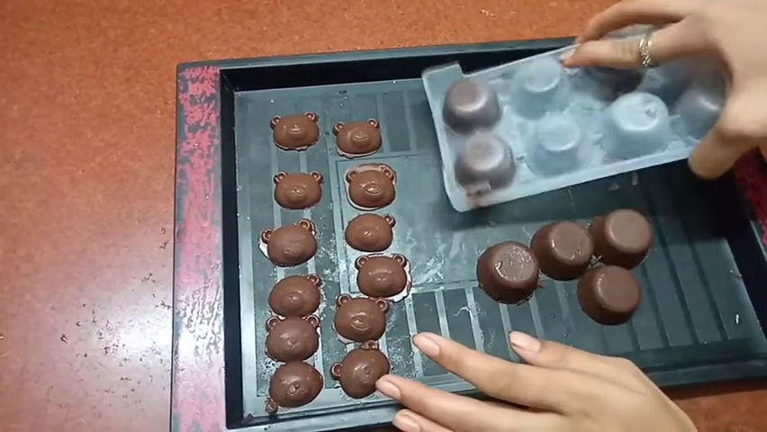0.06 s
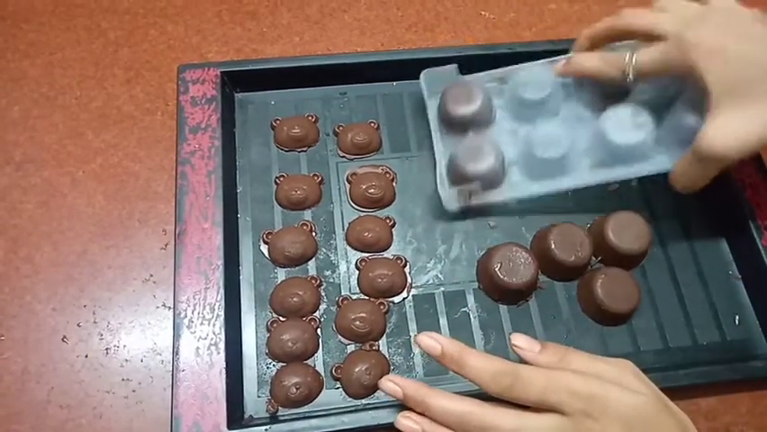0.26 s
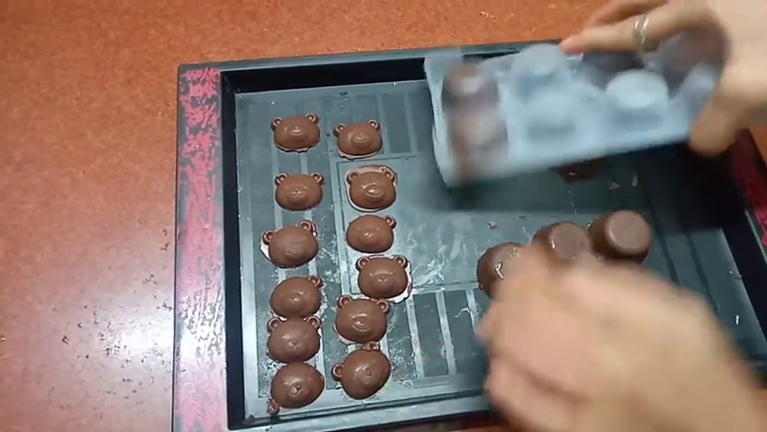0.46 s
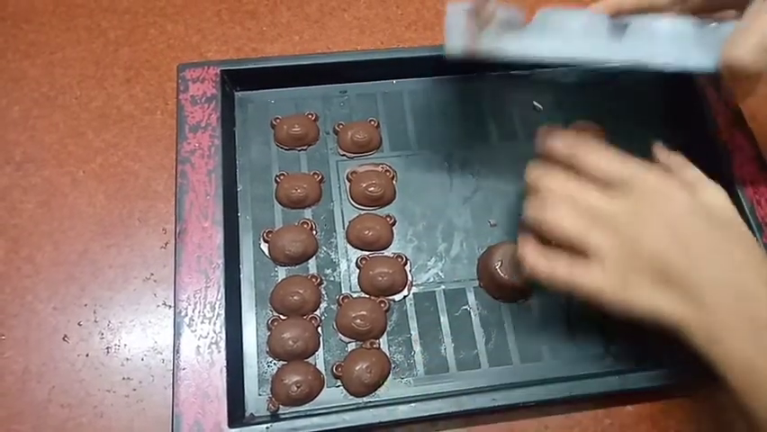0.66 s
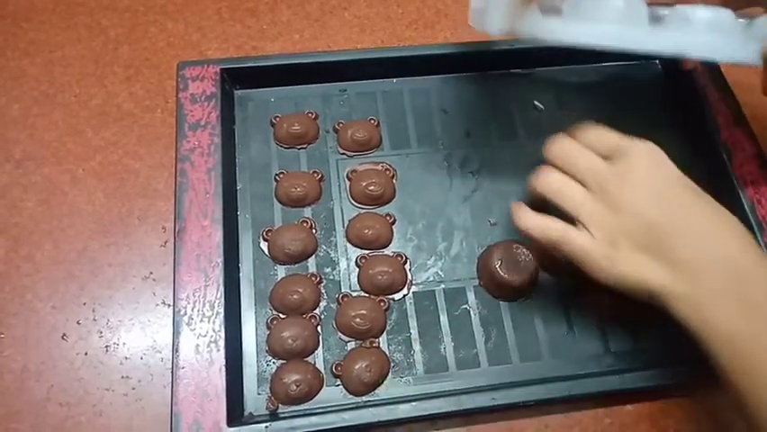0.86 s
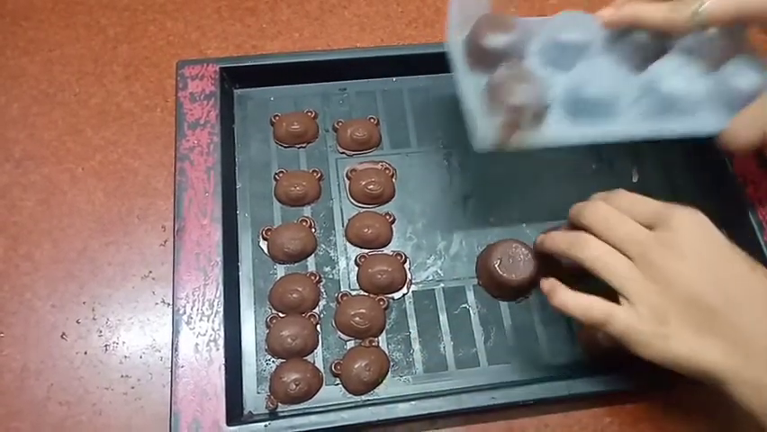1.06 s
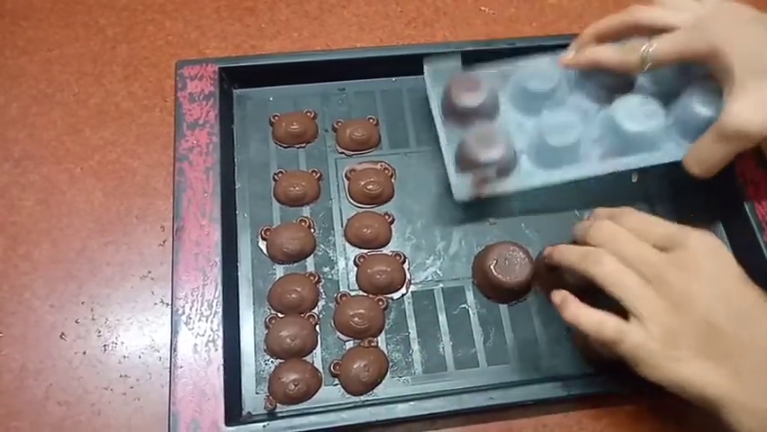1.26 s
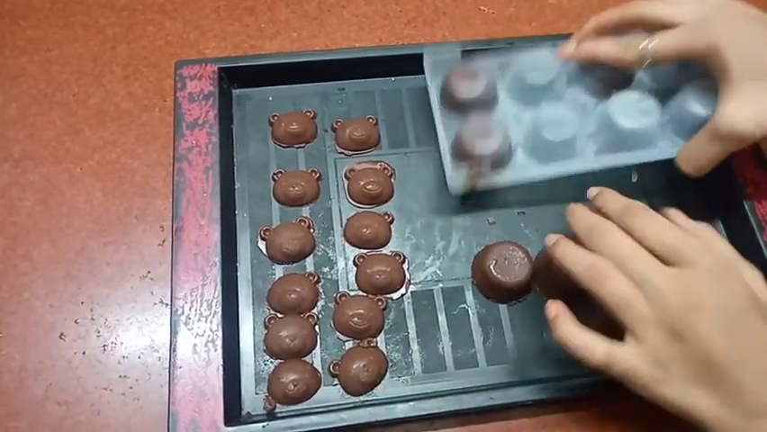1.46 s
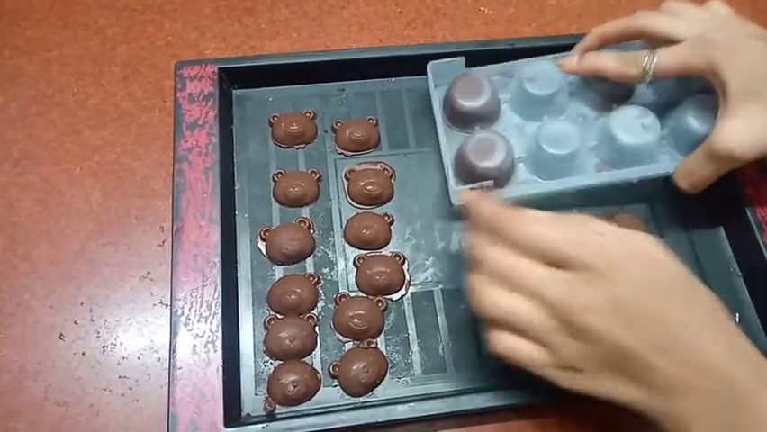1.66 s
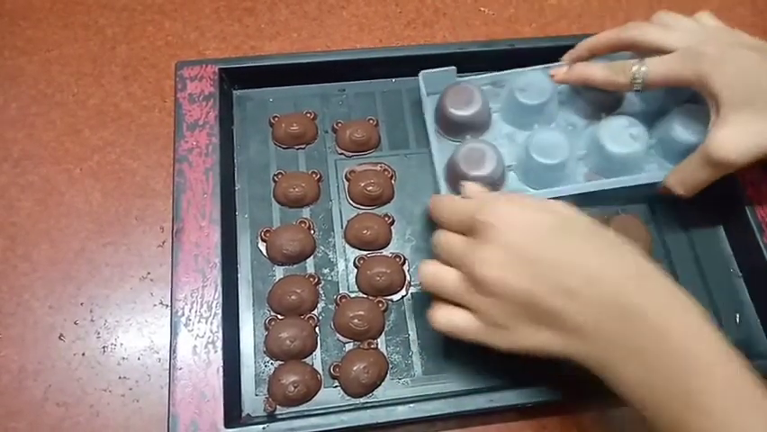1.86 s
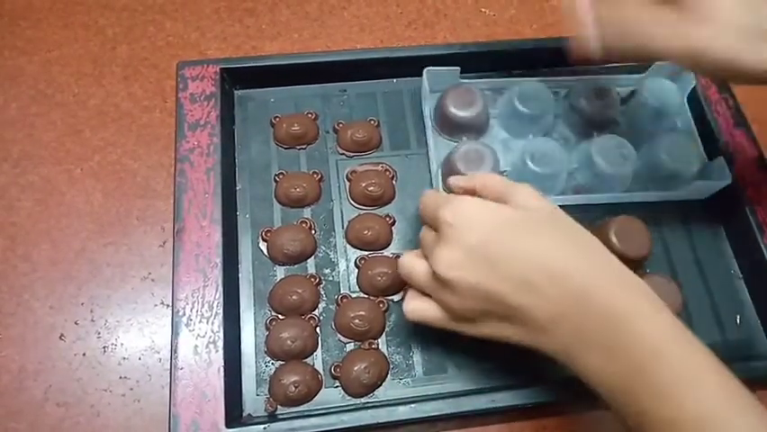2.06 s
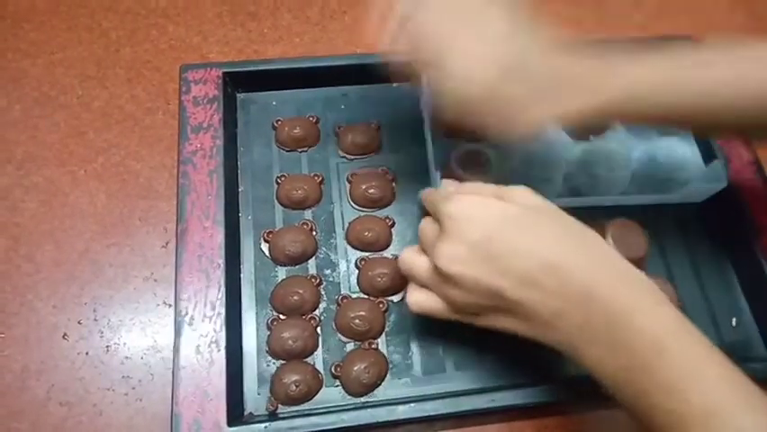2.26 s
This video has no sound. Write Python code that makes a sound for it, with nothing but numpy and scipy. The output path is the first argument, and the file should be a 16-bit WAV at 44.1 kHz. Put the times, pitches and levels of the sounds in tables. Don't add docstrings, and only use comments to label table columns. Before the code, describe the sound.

A plastic mould is slammed on a plastic tray, one hard crack, a pause with small scuffs, then three quick slams, a snap and duller bouncing knocks, close microphone in a live, echoing kitchen.

```python
import sys
import numpy as np
from scipy import signal
from scipy.fft import rfft, irfft
from scipy.io import wavfile
from scipy.ndimage import uniform_filter1d, minimum_filter1d

SR = 44100
rng = np.random.default_rng(int(sys.argv[2]) if len(sys.argv) > 2 else 0)


def inscribe(sig):
    pcm = np.round(np.clip(np.atleast_2d(sig).T, -1, 1) * 32767)
    wavfile.write(sys.argv[1], SR, pcm.astype(np.int16))


def level_to_linear(level):
    exponent = np.asarray(level, float) / 20
    return 10 ** exponent


N = 101429
LEAD = 13230
M = N + LEAD


def table_at(table, hz):
    table_hz, value = np.array(table).T
    return np.interp(np.log(np.maximum(hz, 1)), np.log(table_hz), value)


def unit(x):
    return x / np.sqrt(np.mean(x ** 2))


def decay(t, t60):
    return np.exp(-np.log(1000) * t / t60)


def band(x, hz, width):
    return signal.lfilter(*signal.iirpeak(hz, hz / width, SR), x)


def colour(x, db_of):
    cepstrum = irfft(np.log(level_to_linear(db_of(np.fft.rfftfreq(2048, 1 / SR)))))
    cepstrum[1:1024] *= 2
    cepstrum[1025:] = 0
    impulse = irfft(np.exp(rfft(cepstrum)))
    return signal.fftconvolve(x, impulse)[:len(x)]


# pitch_hz, density_db (per Hz)
AIR = [(25, -39), (60, -31.5), (100, -35), (180, -8.5), (450, -3), (1000, -17), (3800, -14.5),
       (5200, -44.5)]
# pitch_hz, width_hz, level_db
DRONE = [(99.7, 4.4, -60.5), (156.8, 24, -53.5), (203.7, 30, -60.5)]


def air():
    spectrum = AIR + [(9000, -77.5), (16000, -67)]
    hiss = colour(rng.standard_normal(M), lambda hz: table_at(spectrum, hz))
    out = level_to_linear(-50) * unit(hiss)
    for hz, width_hz, db in DRONE:
        out = out + level_to_linear(db) * unit(band(rng.standard_normal(M), hz, width_hz))
    return out


# pitch_hz, level_db
MIC = [(60, -1), (900, 3.5), (4250, 0.5), (5250, -15), (9200, -22), (9800, -32.5), (12300, -32),
       (13000, -28)]


def around(centre_hz, db_oct2):
    def db_of(hz):
        octaves = np.log2(np.maximum(hz, 20) / centre_hz)
        floor_db = -21 + 2 * (hz > centre_hz)
        return np.maximum(db_oct2 * octaves ** 2, floor_db) + table_at(MIC, hz)
    return db_of


# pitch_hz, level_db, t60_s
TRAY = [(71, -1, 0.039), (118.8, -2, 0.3), (269, 20.5, 0.022), (377, 5, 0.046), (444, 0.5, 0.023),
        (673, -10.5, 0.04), (735.3, 3.5, 0.036), (787, 6, 0.067), (844, -14.5, 0.18), (951, 9.5, 0.069),
        (1161.5, -8.5, 0.15)]
# pitch_hz, level_db, t60_s
MOULD = [(1228, 7.5, 0.048), (1427, -0.5, 0.12), (1532, 6, 0.023), (1690, -5.5, 0.09), (1750, -6, 0.15),
         (2059, 6, 0.15), (2065, -6.5, 0.019), (2437, 8.5, 0.12), (2705, 9.5, 0.056), (2880, -22, 0.09),
         (3335, -22, 0.09), (3708, 16, 0.041), (3620, 10.5, 0.016), (4380, -18.5, 0.055)]


def body(damp=1.):
    scatter_db, detune = 2, .004
    t = np.arange(8000) / SR
    hz, db, t60 = np.array(TRAY + MOULD).T[:, :, None]
    level_luck, pitch_luck = rng.standard_normal((2,) + hz.shape)
    tone = np.sin(2 * np.pi * hz * (1 + detune * pitch_luck) * t)
    ring = level_to_linear(db + scatter_db * level_luck) * tone * decay(t, t60 * damp)
    return ring.sum(axis=0)


def strikes(rows, db_oct2, damp=1., skid=False):
    chatter, crack_db, ring_wet_db = 0.021, 5, -13.5
    out = np.zeros((2, M + 20000))
    t = np.arange(8000) / SR
    late = .022 * skid
    for s, db, hz, length in rows:
        shape = np.exp(-((t - late) / length) ** 2) if skid else np.exp(-t / length)
        rattle, hiss = rng.standard_normal((2, len(t)))
        click = 1. * (np.arange(len(t)) == int(late * SR))
        force = chatter * rattle ** 3 * shape
        if not skid:
            force = force + click
        ring = unit(signal.fftconvolve(force, body(damp))[:len(t)])
        crack = level_to_linear(crack_db) * unit(hiss * shape)
        to_room = level_to_linear(ring_wet_db) * ring + unit(click)
        near = unit(colour(ring + crack, around(hz, db_oct2)))
        far = unit(colour(to_room, around(hz, db_oct2)))
        gain = level_to_linear(db) * np.sqrt(length * SR / len(t)) / 2
        i = int((s - late) * SR) + LEAD
        out[:, i:i + len(t)] += gain * np.array([near, far])
    return out[:, :M]


# start_s, level_db, pitch_hz (colour centre), chatter_s
BLOWS = [
    (-.19, 6.5, 2120, 0.0064),
    (.2022, 5, 2270, 0.0021),
    (.2052, 4.5, 1730, 0.0092),
    (1.1572, -2.5, 2100, .003),
    (1.1595, -1.5, 1960, 0.015),
    (1.3515, -1.5, 2350, 0.0032),
    (1.356, -8.5, 935, 0.009),
    (1.385, -9, 1640, 0.0032),
    (1.5385, 2.5, 2180, 0.001),
    (1.5415, 4, 1640, 0.0051),
]


def blows():
    return strikes(BLOWS, -2.2)


# pitch_hz, t60_s
ROOM = [(150, 0.67), (600, 0.54), (1500, 0.91), (3000, 0.68), (6000, 0.6), (12000, 0.5)]


def kitchen(x):
    room_db, rise_s = -3.5, 0.0027
    t = np.arange(SR) / SR
    tail = 0
    for hz in 60 * 2 ** np.arange(0, 8.5, .5):
        tail = tail + band(rng.standard_normal(SR), hz, hz / 3) * decay(t, table_at(ROOM, hz))
    tail = tail * (1 - np.exp(-t / rise_s))
    tail = tail / np.sqrt(np.sum(tail ** 2))
    return level_to_linear(room_db) * signal.fftconvolve(x, tail)[:M]


# start_s, level_db, pitch_hz, t60_s
THUDS = [
    (.2035, -20.5, 108.5, 0.082),
    (1.158, -28, 173, 0.091),
    (1.352, -23, 254, 0.048),
    (1.54, -29, 226, 0.1),
]


def thuds():
    t = (np.arange(M) - LEAD) / SR
    out = np.zeros(M)
    for s, db, hz, t60 in THUDS:
        since = np.maximum(t - s, 0)
        out += level_to_linear(db) * np.sin(2 * np.pi * hz * since) * decay(since, t60)
    return out


# start_s, level_db, pitch_hz (colour centre), chatter_s
TICKS = [
    (.694, -25.5, 1290, 0.0011),
    (.722, -51, 1270, 0.0025),
    (1.077, -32.5, 3040, .001),
    (1.363, -17, 2930, .0015),
    (1.6686, -2.5, 2400, 0.0011),
    (1.68, -21.5, 2380, .002),
    (2.225, -35, 2500, 0.0025),
    (2.268, -38, 3800, 0.0024),
]


def ticks():
    return strikes(TICKS, -4.2, damp=0.2)


# start_s, level_db
SLIDE = [
    (0.719, -43.5),
    (0.798, -47),
    (0.868, -40),
    (0.919, -39.5),
    (0.969, -40),
    (1.009, -47),
    (1.058, -63),
    (1.12, -48),
    (1.15, -50),
]


def slide():
    grains_per_s, grain_db = 1400, 0.5
    chance, size = rng.random((2, M))
    grain_level = level_to_linear(-grain_db * np.log(size + 1e-9))
    grains = (chance < grains_per_s / SR) * grain_level * rng.standard_normal(M)
    ring = unit(signal.fftconvolve(grains, body(.25))[:M])
    sound = colour(ring + 2.1 * unit(grains), around(1400, -2.8))
    s, db = np.array(SLIDE).T
    t = (np.arange(M) - LEAD) / SR
    return unit(sound) * level_to_linear(np.interp(t, s, db, -120, -120))


# start_s (middle of the skid), level_db, pitch_hz (colour centre), half_length_s
SCUFFS = [
    (.749, -22, 960, 0.011),
    (.771, -16, 1400, 0.0051),
    (.79, -34, 2400, 0.024),
]


def scuffs():
    return strikes(SCUFFS, -10.5, damp=0.63, skid=True)


# start_s, level_db, pitch_hz (colour centre), chatter_s
KNOCKS = [
    (.8845, -25.5, 570, 0.011),
    (.885, -42.5, 2360, 0.0015),
    (1.879, -26, 840, 0.018),
    (1.886, -27, 860, 0.015),
    (1.9285, -9.5, 850, 0.0047),
    (1.942, -12.5, 1204, 0.0087),
    (1.955, -12.5, 950, 0.0052),
    (2.0108, -15, 1064, 0.0061),
    (2.011, -22.5, 4100, 0.0014),
    (2.235, -29, 700, .005),
]


def knocks():
    return strikes(KNOCKS, -4.5, damp=0.63)


def scene():
    blow_wet_db, small_wet_db = -4.5, -6
    blow_near, blow_far = blows()
    small_near, small_far = ticks() + slide() + scuffs() + knocks()
    echoes = kitchen(level_to_linear(blow_wet_db) * blow_far + level_to_linear(small_wet_db) * small_far)
    mono = air() + blow_near + small_near + echoes + thuds()
    return np.array([mono[LEAD:], mono[LEAD:]])


def band_limit(x):
    return signal.sosfilt(signal.butter(12, 15600, fs=SR, output="sos"), x)


def record(dry):
    top_db, ahead_s, duck_s, release_db_s = -.7, .023, .006, 102
    x = signal.sosfilt(signal.butter(3, 75, "high", fs=SR, output="sos"), dry[0])
    gain_db = np.minimum(top_db - 20 * np.log10(np.abs(x) + 1e-9), 0)
    ahead = int(ahead_s * SR)
    gain_db = minimum_filter1d(gain_db, ahead, origin=-(ahead // 2), mode="nearest")
    ramp = np.arange(N) * release_db_s / SR
    gain_db = np.minimum.accumulate(gain_db - ramp) + ramp
    x = x * level_to_linear(uniform_filter1d(gain_db, int(duck_s * SR)))
    treble = signal.sosfilt(signal.butter(6, 6000, "high", fs=SR, output="sos"), x)
    wander = unit(uniform_filter1d(rng.standard_normal(N), size=60))
    side = level_to_linear(-11) * treble * wander
    return band_limit(np.array([x + side, x - side]))


dry = scene()
out = record(dry)
inscribe(out)
```